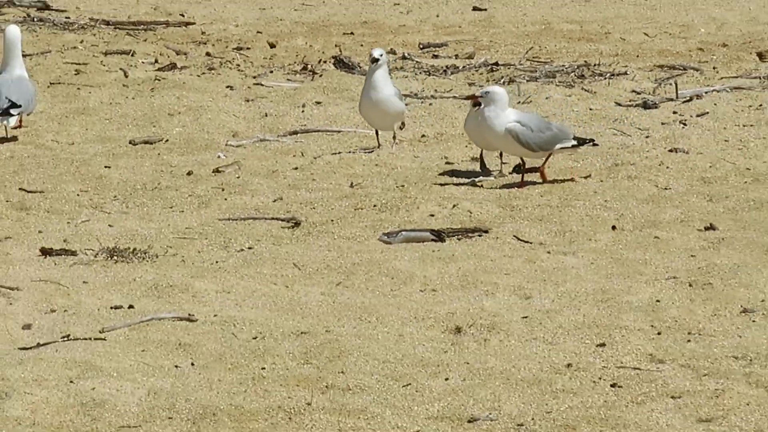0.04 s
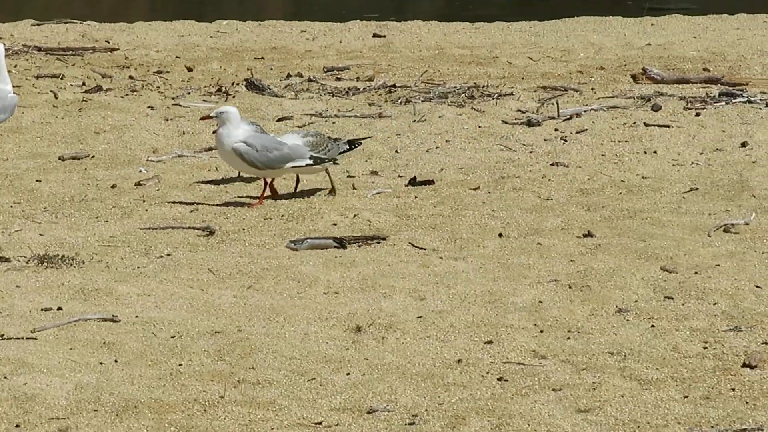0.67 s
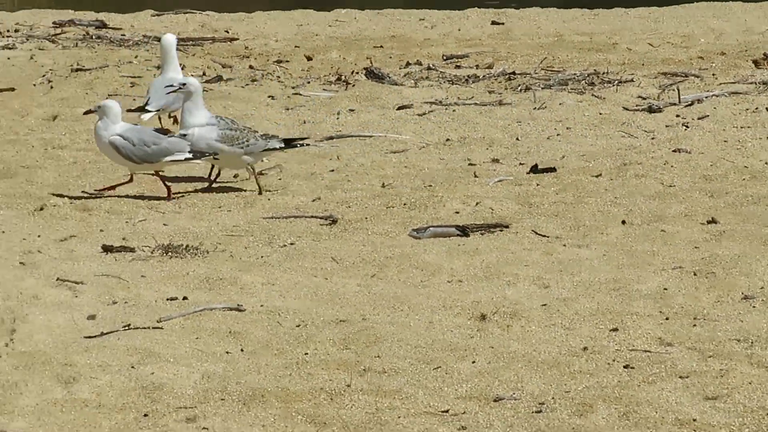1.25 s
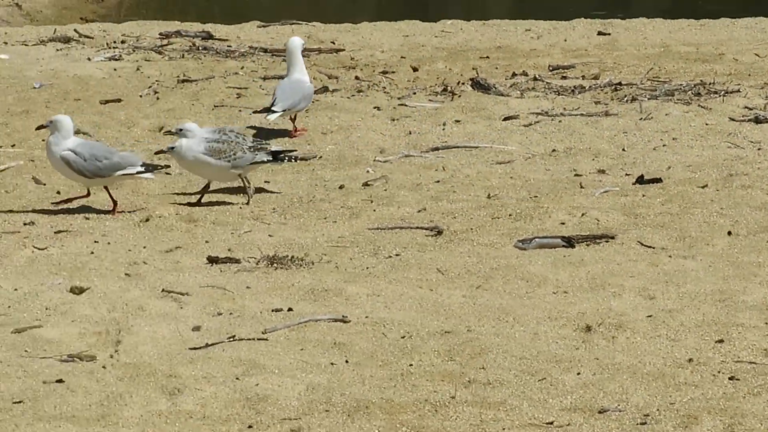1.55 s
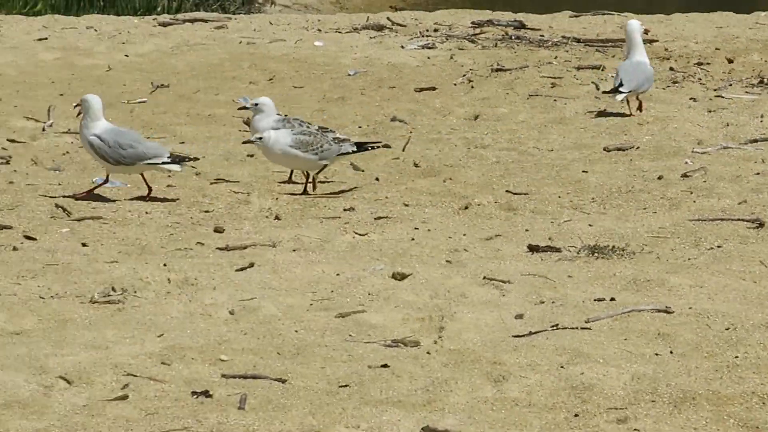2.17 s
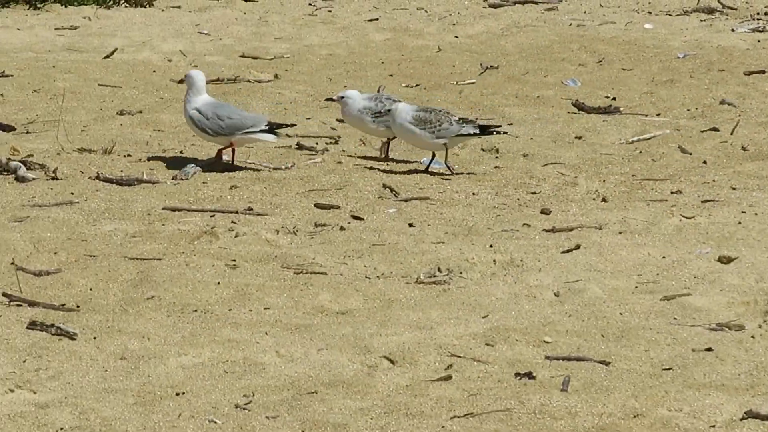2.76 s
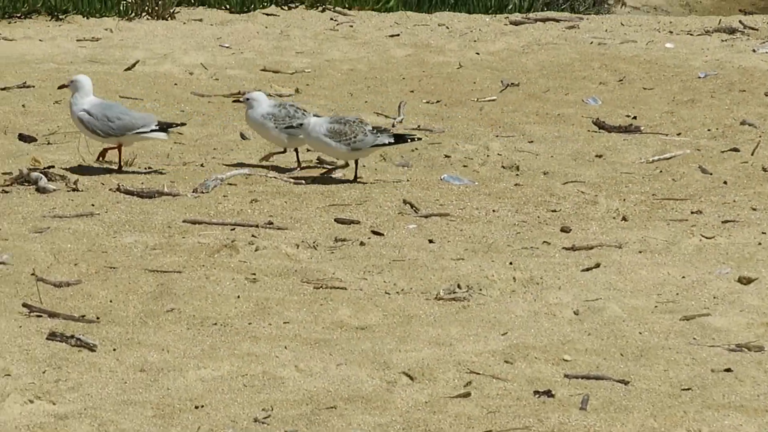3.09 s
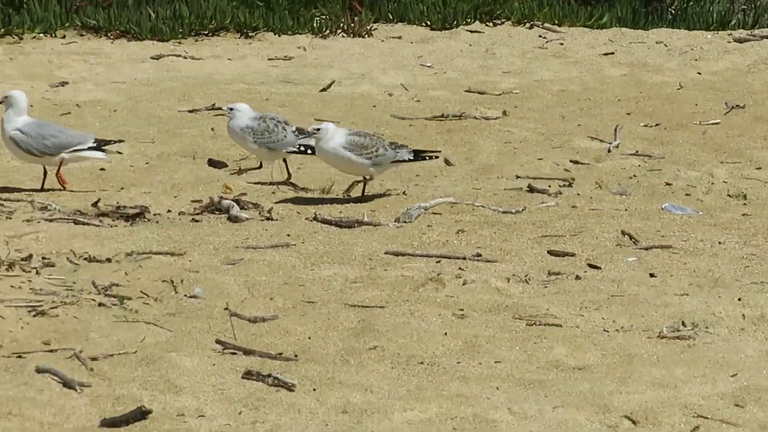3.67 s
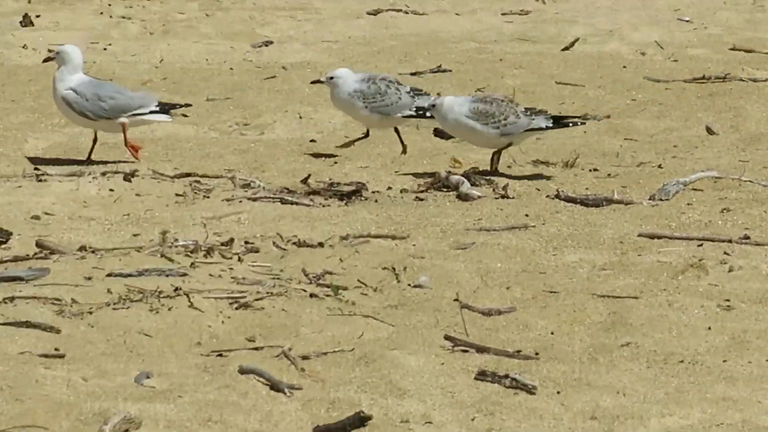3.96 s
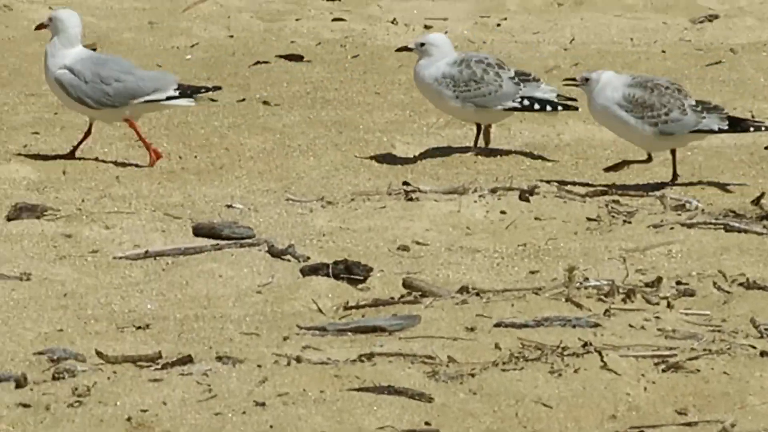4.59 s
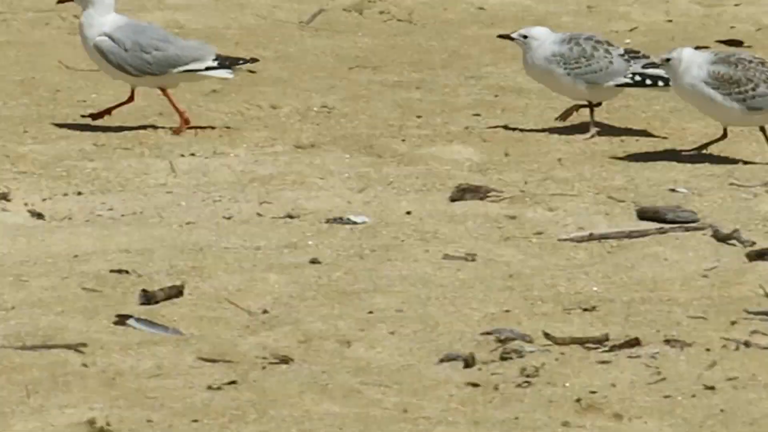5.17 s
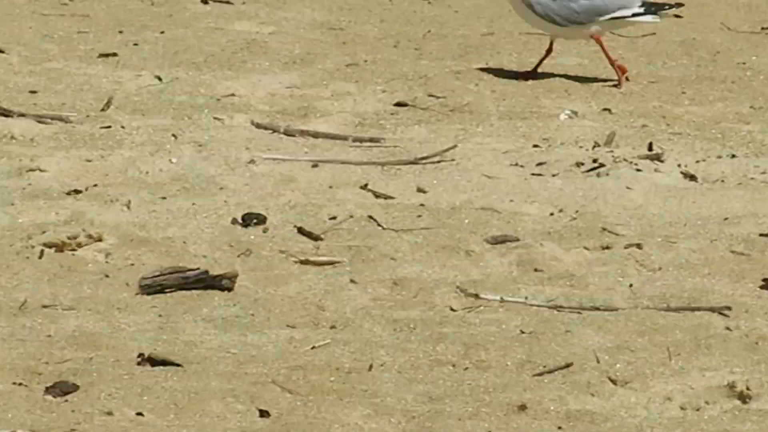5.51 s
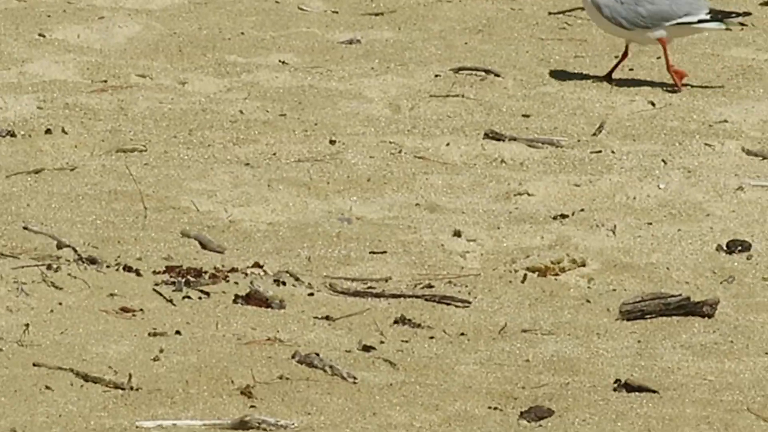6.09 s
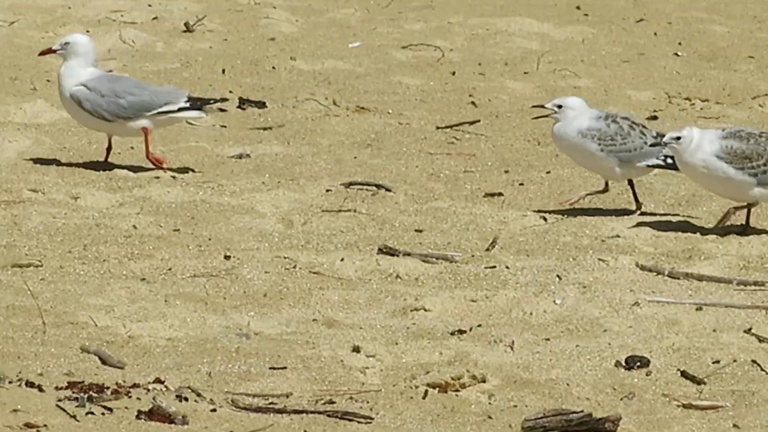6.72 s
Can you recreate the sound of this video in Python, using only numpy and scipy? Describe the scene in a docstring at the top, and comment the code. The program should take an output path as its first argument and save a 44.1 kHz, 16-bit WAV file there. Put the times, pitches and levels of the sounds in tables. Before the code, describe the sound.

Gusty wind rumbles and thumps on the microphone, with high, arching begging whistles from young gulls over faint distant water.

```python
"""Young gulls beg with thin, arched whistles as they follow an adult over an open beach.
Each whistle is an almost pure tone that climbs and sinks; some turn hoarse or break at the end.
Now and then a gull gives a harsh rasp: snaps of its voice box make its throat ring.
Gusts buffet the microphone, pushing its two channels in opposite directions.
Behind it all lie a soft wash of distant water and a high hiss, like far cicadas."""
import sys
import numpy as np
from scipy import signal
from scipy.fft import rfft, irfft, next_fast_len
from scipy.io import wavfile
from scipy.ndimage import uniform_filter1d, minimum_filter1d, map_coordinates

SR = 44100
rng = np.random.default_rng(int(sys.argv[2]) if len(sys.argv) > 2 else 0)


def pcm_store(signal):
    """Save signal as 16-bit PCM."""
    levels = np.round(np.clip(np.atleast_2d(signal), -1, 1) * 32767)
    wavfile.write(sys.argv[1], SR, levels.astype(np.int16).T)


N = 302085
TIME = np.arange(N) / SR

# tone colour of the distant water: frequency_hz, relative_db
WATER_SPECTRUM = [(40, -0.5), (200, -5.5), (400, -5), (700, -3.5), (1400, -8.5), (2300, -13.5), (3000, -21),
                  (4200, -20.5), (8000, -33), (15000, -39.5)]
# tone colour of the high hiss: frequency_hz, relative_db
HISS_SPECTRUM = [(3500, -30.5), (4400, -10.5), (5100, 1), (6500, 0.5), (8000, -2), (9500, -4.5),
                 (10400, -15), (11300, -19.5), (13000, -38), (15500, -49)]
# the whole background drops suddenly at hard wind buffets, then creeps back up: time_s, relative_db
BACKGROUND_LEVELS = [(0, -59), (.45, -56.5), (.71, -57), (.77, -65), (1.05, -60.5), (1.5, -62), (1.66, -69),
                     (2.0, -64.5), (2.88, -63.5), (2.98, -67), (3.22, -66), (3.32, -69), (4.5, -67),
                     (5.95, -66), (6.04, -69), (6.56, -68.5), (6.62, -73.5), (6.85, -71)]
# tiny clicks at the microphone: time_s, peak_db, centre_hz, width_hz
TICKS = [(1.5185, -41, 3180, 3000), (1.6047, -42, 3160, 3000), (4.101, -46, 12000, 4000),
         (4.305, -57, 12500, 4000), (6.587, -45.5, 2980, 3000)]

# strength of the breeze between gusts: time_s, relative_db
BREEZE_LEVELS = [(.05, -39.5), (.28, -27), (.4, -28), (.62, -28), (.8, -18.5), (.97, -32), (1.2, -28.5),
                 (1.35, -15.5), (1.73, -22), (2.35, -15), (2.52, -24.5), (3.0, -15.5), (4.45, -17.5),
                 (4.77, -23.5), (5.1, -14.5), (5.42, -29.5), (5.8, -19.5), (6.85, -20)]
# gusts of wind: start_s, end_s, rumble_db, flutter_db
GUSTS = [(0.319, 0.328, -17.5, -61), (0.472, 0.531, -11, -32), (0.717, 0.743, -10, -20.5),
         (0.853, 0.884, -9, -28.5), (1.258, 1.368, -17, -29.5), (1.467, 1.65, -19.5, -36.5),
         (1.799, 1.889, -17, -31.5), (2.113, 2.228, -11, -31), (2.578, 2.604, -14.5, -35.5),
         (2.677, 2.933, -11, -31), (3.236, 3.326, -25, -24.5), (3.458, 3.553, -15, -24.5),
         (3.919, 3.939, -12.5, -22.5), (4.027, 4.209, -16, -26.5), (4.663, 4.702, -10, -31.5),
         (4.841, 4.833, -11.5, -19.5), (4.94, 4.956, -16, -22.5), (5.025, 5.237, -14.5, -31.5),
         (5.469, 5.521, -18, -38), (5.681, 5.836, -14.5, -25.5), (5.893, 6.008, -19, -36),
         (6.126, 6.186, -28, -37), (6.367, 6.46, -15, -33), (6.547, 6.585, -9, -29),
         (6.759, 6.771, -17, -28.5)]
# broad, slow surges of air that give deep thumps: start_s, end_s, level_db
SURGES = [(0, .3, -29.5), (0.444, 0.532, -16), (.68, 0.76, -19.5), (1.246, 1.367, -40),
          (1.78, 1.893, -21.5), (2.15, 2.196, -29), (5.338, 5.365, -17.5), (5.755, 5.944, -24.5)]
# the hardest buffets, one swirl of air each: time_s, strength_db, half_width_s, wake_db
BUFFETS = [(0.6833, -3.5, 0.00071, -31), (.734, 4, 0.0026, -28), (1.2833, 6.5, 0.0012, -45),
           (1.373, -3.5, 0.00056, -22), (1.4114, -1.5, 0.00071, -20.5), (1.5185, 8, 0.0018, -19),
           (1.6045, 7, 0.00095, -23), (2.162, 4, 0.00077, -22.5), (2.69, -15, 0.00074, -17.5),
           (2.7957, -19, 0.00075, -21), (2.8421, 5.5, 0.00084, -25), (2.8996, -8, 0.00035, -24),
           (2.937, 0, 0.00047, -26), (2.953, 2, 0.0012, -16.5), (3.111, -40, 0.00035, -21.5),
           (3.2487, 5.5, 0.00084, -13.5), (3.27, -8, 0.002, -37), (3.317, -10, 0.00035, -18),
           (3.466, -25, 0.00049, -23.5), (3.8867, -10.5, 0.00037, -42), (4.0728, -3.5, .00048, -25),
           (4.143, -4, 0.00064, -25), (4.5095, -4.5, 0.00055, -22.5), (4.5612, 0, 0.00068, -18.5),
           (4.6736, 6, 0.00094, -24.5), (4.8889, -22, 0.00036, -18), (4.9005, -5.5, 0.00044, -36),
           (5.07, -17, .0005, -14.5), (5.1528, 4.5, 0.00083, -19), (5.228, -6.5, 0.00086, -27),
           (5.3544, -7.5, 0.00079, -34), (5.595, 1, 0.0011, -39), (5.7068, 4.5, 0.0013, -41),
           (5.9177, 3, 0.00071, -16), (6.0084, 7, 0.0009, -19), (6.3286, 4, 0.00074, -21.5),
           (6.382, -3, 0.00065, -33), (6.49, -3, 0.00065, -25.5), (6.5722, 2, 0.00036, -13.5),
           (6.5857, 5, 0.00049, -34), (6.6339, -12, 0.00027, -20), (6.752, -11, 0.00065, -26)]
# tone colour of the surges: frequency_hz, relative_db
SURGE_SPECTRUM = [(12, -30), (30, 1), (55, 2.5), (85, 5.5), (130, 2), (300, -67), (1500, -130)]
# tone colour of the wind's low rumble: frequency_hz, relative_db
RUMBLE_SPECTRUM = [(12, -43), (20, -12), (30, -21), (45, -9), (70, -0.5), (110, 3.5), (170, 0.5),
                   (250, -5.5), (350, -12.5), (500, -26.5), (900, -43.5), (2000, -97)]
# tone colour of the wind's higher flutter: frequency_hz, relative_db
FLUTTER_SPECTRUM = [(100, -11.5), (220, 2), (350, 1), (500, -6.5), (700, -15), (1000, -25.5), (1400, -33.5),
                    (2000, -49), (3500, -80), (8000, -87)]

# a far gull's short cry: time_s, pitch_hz, level_db
FAR_CRY = [(.16, 1266, -71), (0.194, 1402, -44), (.225, 1276, -49), (.26, 1195, -53), (.28, 1100, -72)]
# a tiny high chirp: time_s, pitch_hz, level_db
HIGH_CHIRP = [(2.795, 11300, -80), (2.808, 11650, -72), (2.825, 11950, -80)]
# harsh calls, duller from farther off: start_s, end_s, strength_db, throat_hz, snaps_per_s, top_edge_hz
RASPS = [(2.204, 2.404, -41.5, 2250, 87, 4700), (2.553, 2.744, -57.5, 2160, 135, 2380),
         (2.998, 3.07, -54, 1690, 140, 1920), (3.156, 3.192, -60, 1980, 120, 2400)]
# the ways a gull's throat rings: multiple_of_throat_hz, width_hz, gain_db
THROAT_RINGS = [(.68, 240, -8), (.91, 170, -3), (1.01, 140, 2), (1.18, 260, -8), (1.33, 220, -7),
                (1.56, 300, -12), (1.82, 180, -7)]
# the lower and upper tone of a hoarse voice: pitch_hz, width_hz
HOARSE_TONES = [(3250, 150), (4280, 410)]
# stretches where those tones sound under a whistle: start_s, end_s, lower_db, upper_db
HOARSE_SPELLS = [(1.93, 2.07, -75, -72), (2.84, 2.962, -72, -73), (3.7, 3.807, -74, -70),
                 (4.5, 4.65, -77, -75), (5.406, 5.5, -78, -84), (5.693, 5.83, -84, -70),
                 (6.33, 6.47, -79, -72)]
# the voice breaking to a lower, sliding note as a whistle ends: start_s, length_s, level_db
VOICE_BREAKS = [(2.681, .063, -57.5), (3.805, 0.053, -67), (4.917, 0.089, -57.5), (5.945, .071, -58)]
# begging whistles, each one arch of pitch: start_s, top_s, end_s, start_hz, top_hz, end_hz,
# early_db, late_db, closing_fade_db, octave_relative_db
WHISTLES = [(.178, .289, .47, 4360, 5100, 4450, -44.5, -50, 5, -25),
            (0.431, 0.572, .725, 4220, 4905, 4460, -37, -43, 20, -16.5),
            (1.003, 1.083, 1.285, 4760, 5330, 4590, -57.5, -56.5, 8, -14),
            (1.335, 1.451, 1.595, 4230, 5030, 4780, -43, -43.5, 21, -21),
            (1.874, 1.967, 2.175, 4880, 5320, 4650, -54.5, -55.5, 4, -17.5),
            (2.438, 2.556, 2.685, 4400, 5220, 4820, -45.5, -50.5, -0.5, -16.5),
            (2.815, 2.891, 3.095, 4940, 5350, 4800, -58.5, -66, 4, -17),
            (3.538, 3.627, 3.8, 4670, 5280, 4800, -55.5, -63, -1, -21),
            (3.639, 3.74, 3.925, 4630, 5260, 4720, -56.5, -67, -2, -23),
            (4.467, 4.561, 4.755, 5020, 5310, 4680, -66, -67, 3, -14),
            (4.695, 4.769, 4.92, 5020, 5300, 4990, -64.5, -52, 3, -11),
            (5.349, 5.43, 5.61, 5030, 5320, 4750, -64, -65, 2, -16),
            (5.729, 5.766, 5.95, 4750, 5290, 5000, -52.5, -52, 7, -13),
            (6.283, 6.352, 6.572, 4960, 5310, 4580, -62, -60, 6, -15),
            (6.728, 6.794, 6.97, 4860, 5350, 4700, -61.5, -50, 5, -15)]


def from_db(db):
    """Turn decibels into a number to multiply by."""
    return 10 ** (np.asarray(db) / 20)


def rms_one(x):
    """Scale a signal so that its average strength (rms) is 1."""
    return x / np.sqrt(np.mean(x ** 2) + 1e-20)


def in_time(rows):
    """Join a table's points with straight lines: one curve for each column after the time."""
    times, *columns = np.transpose(rows)
    return [np.interp(TIME, times, column) for column in columns]


def gate(start, end, fade_s):
    """1 between two times and 0 outside, fading in and out."""
    return np.clip(np.minimum(TIME - start, end - TIME) / fade_s, 0, 1)


def drift(per_s):
    """A smooth random wobble of rms 1, with about per_s new values a second."""
    coarse = TIME[::8]
    slow = map_coordinates(rng.standard_normal(8192), [coarse * per_s], order=3, mode="wrap")
    return np.interp(TIME, coarse, rms_one(slow))


def colour(x, spectrum):
    """Give x a tone colour, at rms 1."""
    hz, db = np.transpose(spectrum)
    size = next_fast_len(N, True)
    bin_hz = np.maximum(np.arange(size // 2 + 1) * SR / size, 1)
    gains = from_db(np.interp(np.log(bin_hz), np.log(hz), db))
    return rms_one(irfft(rfft(x, size) * gains, size)[:N])


def noise(spectrum):
    """Noise of rms 1 with the given tone colour."""
    return colour(rng.standard_normal(N), spectrum)


def resonate(x, hz, width_hz):
    """Make x ring around one pitch; a smaller width rings longer."""
    r = np.exp(-np.pi * width_hz / SR)
    feedback = [1, -2 * r * np.cos(2 * np.pi * hz / SR), r * r]
    return signal.lfilter(np.array([1, 0, -1]) * (1 - r * r) / 2, feedback, x + 1e-18)


def pan(x, left_db):
    """Place a sound by making it left_db louder on the left than on the right."""
    return x * from_db([[left_db / 2], [-left_db / 2]])


def diffuse(spectrum, likeness):
    """Stereo noise from all round; likeness runs from -1 (opposite sides) to 1 (equal sides)."""
    likeness = np.clip(likeness, -.95, .95)
    common = np.sqrt(1 + likeness) * noise(spectrum)
    opposed = np.sqrt(1 - likeness) * noise(spectrum) * [[1], [-1]]
    return (common + opposed) / np.sqrt(2)


def water_and_hiss(water_db, hiss_db):
    """Distant water and a high hiss; their level drops at set times, at hard buffets, then creeps back."""
    db, = in_time(BACKGROUND_LEVELS)
    water = diffuse(WATER_SPECTRUM, likeness=.47)
    hiss = pan(diffuse(HISS_SPECTRUM, likeness=-.24), left_db=-1)
    return from_db(db + water_db) * water + from_db(db + hiss_db) * hiss


def ticks():
    """Each click is one very short ring that dies at once."""
    out = np.zeros(N)
    for time_s, db, hz, width in TICKS:
        click = resonate(resonate(signal.unit_impulse(256), hz, width), hz, width)
        start = round(time_s * SR)
        out[start:start + len(click)] += from_db(db) * click / np.abs(click).max()
    return out


def gust(start, end, rise_s=.011, fall_s=.019):
    """A gust rises quickly, holds and dies away."""
    outside = np.maximum((start - TIME) / rise_s, (TIME - end) / fall_s)
    return np.exp(-np.clip(outside, 0, 20))


def airflow():
    """Strength of the wind's rumble and flutter, as gusts add to the breeze."""
    breeze_db, = in_time(BREEZE_LEVELS)
    rumble_power = from_db(breeze_db) ** 2
    flutter_power = from_db(1.42 * breeze_db - 9.5) ** 2   # flutter grows faster than rumble
    for start, end, rumble_db, flutter_db in GUSTS:
        shape = gust(start, end)
        rumble_power += (from_db(rumble_db) * shape) ** 2
        flutter_power += (from_db(flutter_db) * shape) ** 2
    return np.sqrt(rumble_power), np.sqrt(flutter_power)


def small_swirls(per_s, size_spread_db):
    """Many small swirls of air strike the microphone one by one, with lulls between them."""
    strikes = rng.random(N) < per_s / SR
    sizes = from_db(size_spread_db * np.clip(rng.standard_normal(N), -2, 1))
    return colour(strikes * sizes * rng.choice([-1, 1], N), FLUTTER_SPECTRUM)


def buffets(gain_db, low_cut_hz):
    """A passing swirl gives one bell-shaped push of pressure; the bass cut makes it swing back."""
    out = np.zeros(N)
    for time_s, db, half_width_s, _ in BUFFETS:
        at = slice(int((time_s - .02) * SR), int((time_s + .02) * SR))
        out[at] += from_db(db + gain_db) / (1 + ((TIME[at] - time_s) / half_width_s) ** 2)
    return signal.sosfilt(signal.butter(1, low_cut_hz, "high", fs=SR, output="sos"), out)


def wakes(decay_s, gain_db):
    """Strength of the churning air behind each buffet: it starts at once and dies quickly."""
    kicks = np.zeros(N)
    for time_s, _, half_width_s, wake_db in BUFFETS:
        kicks[round((time_s - 3 * half_width_s) * SR)] = from_db(wake_db + gain_db)
    tails = signal.lfilter([1], [1, -np.exp(-1 / (decay_s * SR))], kicks + 1e-18)
    return uniform_filter1d(tails, size=90)


def wind(rumble_db, flutter_db, lumps_db, common_db, left_db):
    """Deep surges and lumpy, churning air push the two channels mostly in opposite directions."""
    rumble_flow, flutter_flow = airflow()
    rumble_gain = rumble_flow * from_db(rumble_db) * rms_one(from_db(lumps_db * drift(130)))
    surge_gain = sum(from_db(db) * gust(start, end) for start, end, db in SURGES)
    wake_gain = wakes(decay_s=.008, gain_db=3)
    flutter = flutter_flow * from_db(flutter_db) * small_swirls(per_s=140, size_spread_db=8)
    pushes = buffets(gain_db=-1.5, low_cut_hz=234)
    opposed = surge_gain * noise(SURGE_SPECTRUM) + rumble_gain * noise(RUMBLE_SPECTRUM)
    opposed += flutter + wake_gain * noise(FLUTTER_SPECTRUM) + pushes
    # a small part, common to both channels, stirs whenever a swirl passes
    stir = np.sqrt(np.abs(uniform_filter1d(flutter ** 2, size=200)) + wake_gain ** 2)
    common = surge_gain * noise(SURGE_SPECTRUM) + rumble_gain * noise(RUMBLE_SPECTRUM)
    common += from_db(3.5) * stir * noise(FLUTTER_SPECTRUM) + 1.04 * pushes
    return pan(opposed, left_db) * [[1], [-1]] + from_db(common_db) * common


def beach_echo(x, echo_db, die_away_s):
    """Dunes and driftwood scatter back a faint tail, different on each side."""
    t = TIME[:SR // 2]
    tail = rng.standard_normal((2, len(t))) * from_db(-60 * t / die_away_s) * (t > .004)
    tail /= np.sqrt(np.sum(tail ** 2, axis=1, keepdims=True))
    return from_db(echo_db) * signal.fftconvolve(x[None], tail, axes=1)[:, :N]


def far_bird(curve, roughness):
    """A far bird's short note, of which just one tone carries over the sand."""
    hz, db = in_time(curve)
    phase = 2 * np.pi * np.cumsum(hz * (1 + roughness * drift(900))) / SR
    return np.sqrt(2) * np.sin(phase) * from_db(db) * gate(curve[0][0], curve[-1][0], fade_s=.012)


def rasps(opening_air, sag, snap_spread_db):
    """Slow, uneven snaps of a gull's voice box, each with a puff of air, ring its throat."""
    out = np.zeros(N)
    air, wobble = rng.standard_normal(N), drift(80)
    strength = from_db(snap_spread_db * drift(60))
    for start, end, db, throat_hz, snaps_per_s, top_hz in RASPS:
        at = np.flatnonzero((TIME > start) & (TIME < end))
        progress = np.linspace(0, 1, len(at))
        cycle = np.cumsum(snaps_per_s * (1 + .16 * wobble[at])) / SR % 1
        snaps = np.diff(cycle, prepend=1) < 0
        puffs = air[at] * (.17 * np.exp(-cycle / .25) + .015)
        opening_rush = opening_air * air[at] * np.exp(-10 * progress)
        source = (snaps + puffs) * strength[at] + opening_rush
        voice = sum((-1) ** k * from_db(ring_db) * resonate(source, multiple * throat_hz, width)
                    for k, (multiple, width, ring_db) in enumerate(THROAT_RINGS))
        voice = signal.sosfilt(signal.butter(2, [1200, top_hz], "band", fs=SR, output="sos"), voice)
        voice /= np.sqrt(uniform_filter1d(voice ** 2, size=1400) + 1e-20)   # steady effort
        slowing = np.cumsum(1 - sag * progress ** 5)   # the pitch sags as the call dies
        voice = map_coordinates(voice, [slowing], order=3, mode="nearest")
        out[at] += from_db(db) * voice * np.interp(progress, [0, .02, .68, 1], [.36, .38, .57, .17])
    return out


def hoarseness():
    """At the top of some whistles the voice roughens into two lower, unsteady tones."""
    out = np.zeros(N)
    for k, (hz, width) in enumerate(HOARSE_TONES):
        tone = rms_one(resonate(resonate(rng.standard_normal(N), hz, width), hz, width))
        for start, end, *levels_db in HOARSE_SPELLS:
            out += tone * from_db(levels_db[k]) * gate(start, end, fade_s=.018)
    return out


def whistle_tone(t, hz, db, octave_db):
    """A pure tone with a weak one an octave above, over the times t."""
    phase = 2 * np.pi * np.cumsum(hz) / SR
    edges = np.clip(np.minimum(t - t[0], t[-1] - t) / .0068, 0, 1)
    return np.sqrt(2) * (np.sin(phase) + from_db(octave_db) * np.sin(2 * phase)) * from_db(db) * edges


def voice_breaks(tremble, shimmer_db, start_hz, end_hz, fade_db):
    """The voice breaks to a lower note that slides down and dies away."""
    out = np.zeros(N)
    for start, length, level_db in VOICE_BREAKS:
        at = np.flatnonzero((TIME > start) & (TIME < start + length))
        progress = np.linspace(0, 1, len(at))
        hz = end_hz + (start_hz - end_hz) * (1 - progress) ** 1.4
        db = level_db - fade_db * progress ** 2 + shimmer_db[at]
        out[at] += whistle_tone(TIME[at], hz * tremble[at], db, octave_db=-17)
    return out


def whistles(tremble, shimmer_db, swell_s, fade_s, crack_hz, crack_s):
    """Each begging call climbs quickly and sinks more slowly; pitch and strength tremble a little."""
    out = np.zeros(N)
    easy_climb_hz, softer_db_per_hz = 375, .0241   # a call with farther to climb starts softer
    for start, top, end, start_hz, top_hz, end_hz, early_db, late_db, fade_db, octave_db in WHISTLES:
        at = np.flatnonzero((TIME > start) & (TIME < end))
        t = TIME[at]
        climb_left = np.interp(t, [start, top], [1, 0]) ** 1.5   # the powers round off the arch
        sunk = np.interp(t, [top, end], [0, 1]) ** 1.99
        hz = top_hz - (top_hz - start_hz) * climb_left - (top_hz - end_hz) * sunk
        if any(abs(break_s - end) < .015 for break_s, _, _ in VOICE_BREAKS):
            hz -= crack_hz * np.exp((t - end) / crack_s)   # the pitch gives way just before a break
        swell_db = softer_db_per_hz * (top_hz - start_hz - easy_climb_hz)
        db = np.interp((t - start) / (end - start), [.25, .75], [early_db, late_db])
        db -= np.interp(t - start, [0, swell_s], [swell_db, 0])
        db -= np.interp(end - t, [0, fade_s], [fade_db, 0])
        db += shimmer_db[at] * np.interp(early_db, [-59, -45], [1.5, .7])   # loud calls are steadier
        out[at] += whistle_tone(t, hz * tremble[at], db, octave_db)
    return out


def scene():
    """Gulls in front, the beach around, wind on the microphone."""
    tremble = 1 + .003 * drift(700) + .003 * drift(45) + .0033 * drift(110)   # wobble in pitch
    shimmer_db = drift(110)   # wobble in strength
    birds = whistles(tremble, shimmer_db, swell_s=.038, fade_s=.083, crack_hz=380, crack_s=.0035)
    birds += voice_breaks(tremble, shimmer_db, start_hz=4340, end_hz=3880, fade_db=10)
    birds += hoarseness()
    birds += rasps(opening_air=.18, sag=.23, snap_spread_db=1.5)
    birds += far_bird(FAR_CRY, roughness=.1) + far_bird(HIGH_CHIRP, roughness=.006)
    air = wind(rumble_db=-2, flutter_db=-.5, lumps_db=3, common_db=-14.5, left_db=1.27)
    beach = water_and_hiss(water_db=9, hiss_db=7.5) + beach_echo(birds, echo_db=-14.5, die_away_s=.21)
    return beach + ticks() + air + pan(birds, left_db=2)


def record(dry):
    """Cut the deepest bass, turn everything down briefly under the hardest buffets, cut the very top."""
    x = signal.sosfilt(signal.butter(2, 34, "high", fs=SR, output="sos"), dry)
    too_loud_db = 20 * np.log10(np.maximum(np.abs(x).max(axis=0), 1))
    recovery_db = 60 * TIME   # the level comes back at 60 dB a second
    dip_db = np.maximum.accumulate(too_loud_db + recovery_db) - recovery_db
    gain = uniform_filter1d(minimum_filter1d(from_db(-dip_db), size=181), size=181)
    top_cut_hz = 15700
    return signal.sosfilt(signal.ellip(10, .1, 90, top_cut_hz, fs=SR, output="sos"), x * gain)


dry = scene()
out = record(dry)
pcm_store(out)
```